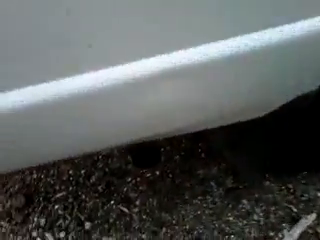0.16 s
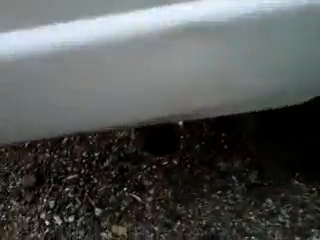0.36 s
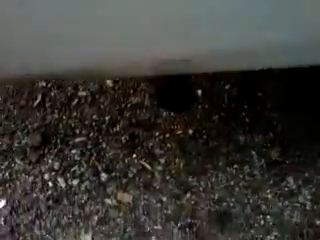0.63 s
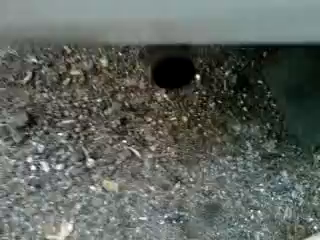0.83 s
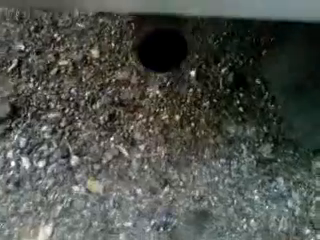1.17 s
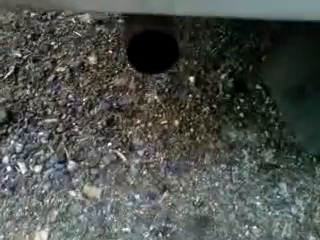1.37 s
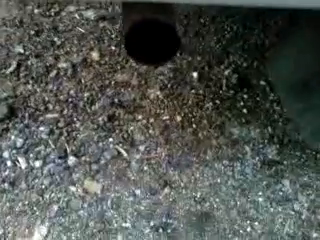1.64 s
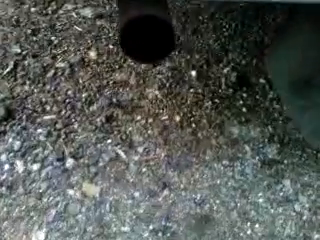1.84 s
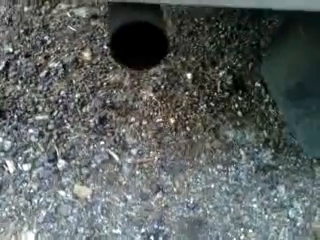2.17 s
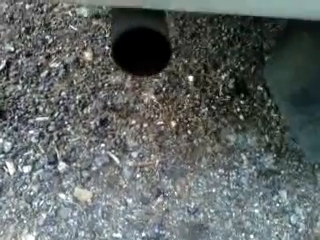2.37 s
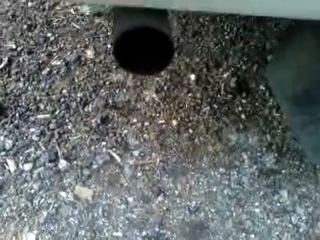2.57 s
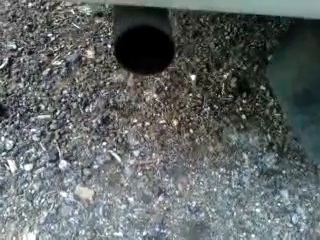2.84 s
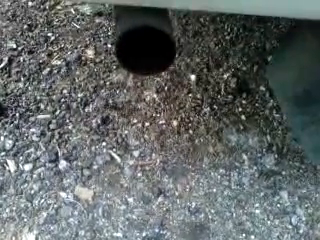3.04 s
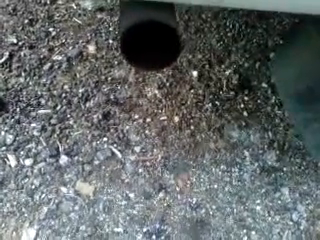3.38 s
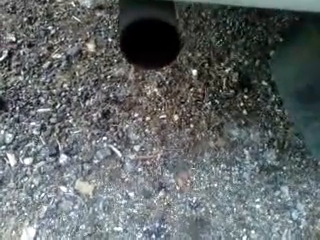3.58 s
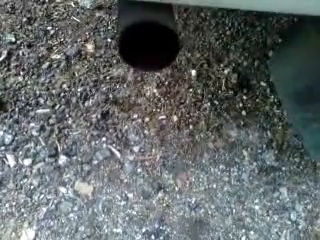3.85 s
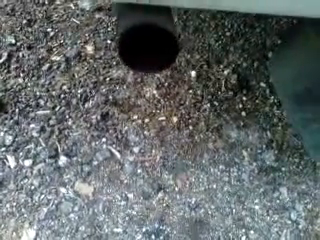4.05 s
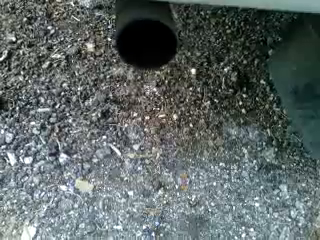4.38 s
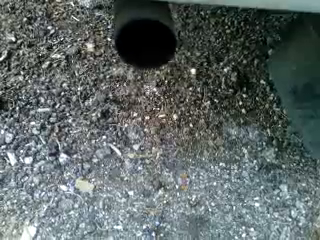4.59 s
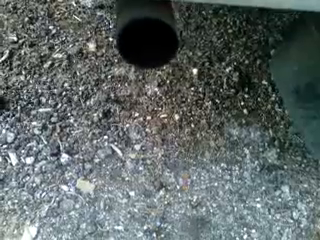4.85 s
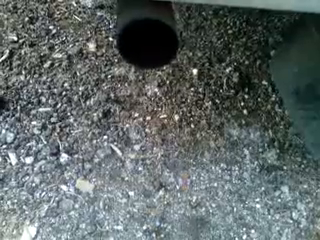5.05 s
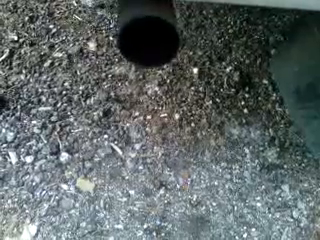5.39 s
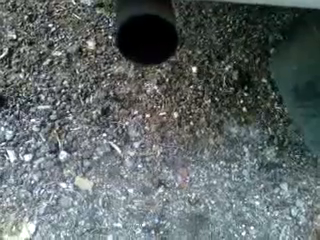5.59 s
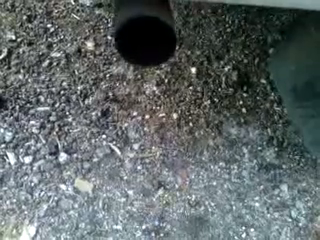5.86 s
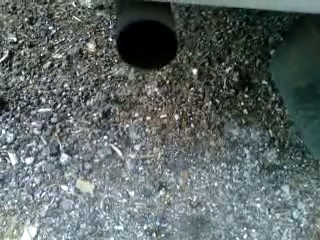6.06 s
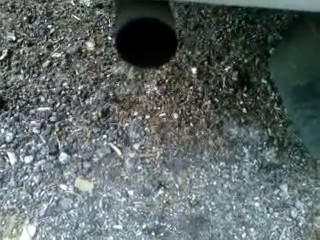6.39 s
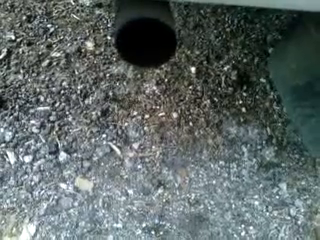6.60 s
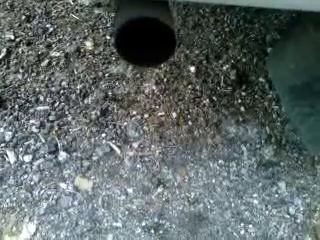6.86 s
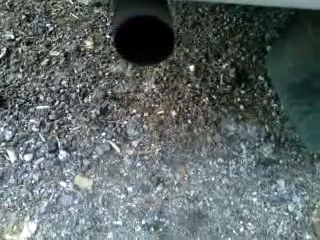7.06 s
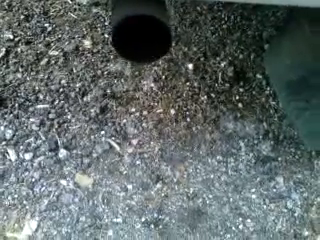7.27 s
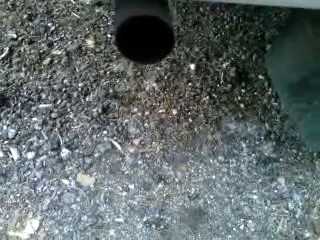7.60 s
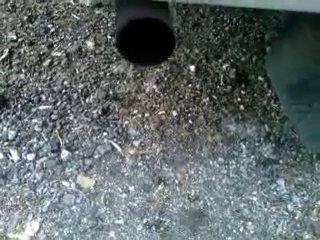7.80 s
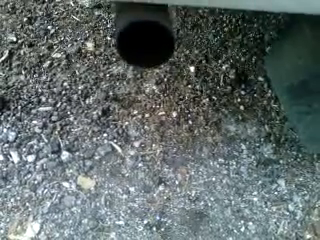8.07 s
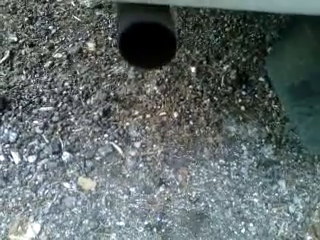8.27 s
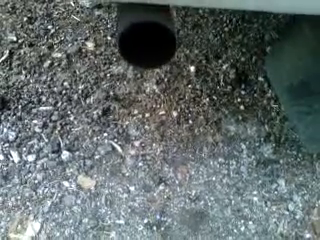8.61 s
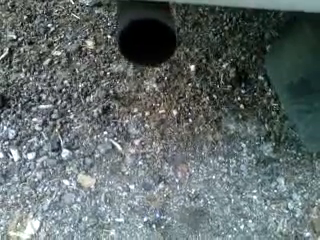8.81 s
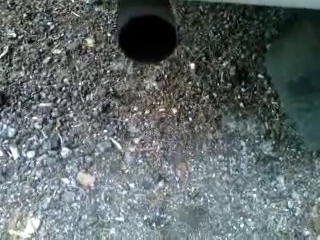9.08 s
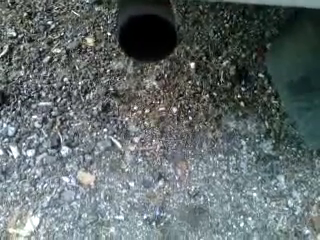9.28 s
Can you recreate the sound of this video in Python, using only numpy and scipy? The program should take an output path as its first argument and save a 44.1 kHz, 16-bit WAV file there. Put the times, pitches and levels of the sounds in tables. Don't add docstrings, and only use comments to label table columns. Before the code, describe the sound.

Rapid, low exhaust pulses, about twenty-five a second, merge into a fluttering throb, heard very close outdoors. Puffs of gas ring hollowly in the pipe and the engine bay hisses behind. Early on, wind-like gusts buffet the microphone, strongest just after one second; from the middle onwards a steady droning pipe note swells and sags in uneven surges. The sound is band-limited and slightly gritty.

```python
import sys
import numpy as np
from scipy import signal
from scipy.fft import rfft, irfft, dct
from scipy.io import wavfile
from scipy.ndimage import uniform_filter1d

SR = 44100
rng = np.random.default_rng(int(sys.argv[2]) if len(sys.argv) > 2 else 0)


def convert_level_to_amplitude(level_db):
    exponent = np.asarray(level_db, float) / 20
    return 10 ** exponent


def file_out(sig):
    cols = np.atleast_2d(sig).T
    lim = np.clip(cols, -1, 1)
    pcm = np.round(lim * 32767).astype(np.int16)
    wavfile.write(sys.argv[1], SR, pcm)


N = 415863

ORDER_ON_PIPE = 7
SEAM_HZ, CUTOFF_HZ = 4010, 7250


def rms_one(x):
    return x / np.sqrt(np.mean(x ** 2) + 1e-20)


def in_time(rows):
    s, *columns = np.transpose(rows)
    return [np.interp(np.arange(N) / SR, s, column) for column in columns]


def bumps(rows, width_s):
    t = np.arange(0, N, 100) / SR
    level_db = sum(rise_db * np.exp(-((t - s) / width_s) ** 2) for s, rise_db in rows)
    return np.interp(np.arange(N) / SR, t, level_db)


def drift(rate):
    r = np.exp(-80 * np.pi * rate / SR)
    settle = 2000
    noise = rng.standard_normal(N // 40 + settle + 2)
    slow = signal.lfilter([1], [1, -2 * r, r * r], noise)[settle:]
    return np.interp(np.arange(N) / 40, np.arange(len(slow)), rms_one(slow))


def resonate(x, modes):
    out = 0
    for k, (hz, width, level_db) in enumerate(modes):
        r = np.exp(-np.pi * width / SR)
        a = [1, -2 * r * np.cos(2 * np.pi * hz / SR), r * r]
        b = np.array([1, 0, -1]) * (1 - r * r) / 2
        out = out + (-1) ** k * convert_level_to_amplitude(level_db) * signal.lfilter(b, a, x)
    return out


def coloured(points, patchy_db, count):
    hz, level_db = np.transpose(points)
    grid = np.maximum(np.arange(N // 2 + 1) * SR / N, 1)
    gain_db = np.interp(np.log(grid), np.log(hz), level_db, left=-120, right=-120)
    shaped = rfft(rng.standard_normal(N)) * convert_level_to_amplitude(gain_db)
    place = count * np.log(grid / hz[0]) / np.log(hz[-1] / hz[0])
    total = 0
    for k in range(count + 1):
        band = irfft(shaped * np.clip(1 - abs(place - k), 0, 1), N)
        total = total + band * convert_level_to_amplitude(patchy_db * drift(9))
    return rms_one(total)


def even(x, window_s):
    return x / np.sqrt(uniform_filter1d(x ** 2, int(window_s * SR)) + 1e-9)


def hunting():
    # (speed is up [s], swell is cut [s], speed lift [Hz], sag after it [Hz], swell [dB])
    surges = [(0.2, 0.71, 2.1, 3.5, 0.5), (1.058, 1.738, 3.32, 3, 2.5), (2.068, 2.229, 3.28, 0.0, -0.3),
              (2.571, 2.83, 4.2, 1.3, 4), (3.51, 3.9, 4.7, 2.0, 5.5), (4.333, 4.673, 3.6, 0.3, 8),
              (4.888, 5.099, 2.47, 0.5, 4.5), (5.432, 5.75, 4.3, 1.7, 7.5), (6.451, 6.671, 3.7, 1.1, 7),
              (6.979, 7.139, 2.18, 1.7, 3.5), (7.541, 7.792, 2.1, 0.0, 6.3), (8.162, 8.393, 1.54, 0.0, 2.8),
              (8.83, 9.101, 2.08, 1, 4.3)]
    # (time [s], loss [dB])
    stumbles = [(.09, 14.5), (.24, -2), (.36, 3), (.6, 3), (.86, 5.5), (1.01, 4), (1.2, -1), (1.96, 4),
                (2.8, -1.5), (2.87, 2), (2.94, -3.5), (3.001, 5.5), (3.33, 3), (4.02, -1.5), (4.15, 8),
                (5.97, 5), (6.2, 0.5), (7.21, 1.5), (8.03, 1), (8.76, 0), (9.28, 5)]
    rest_hz = 178.54
    rise_s, ease_s, fall_s, recover_s = .209, .077, .079, .425
    lag_s, swell_rise_s, cut_s = .04, .11, .07
    early_share, sag_db_per_hz = .68, 1.85
    t = np.arange(N) / SR
    hz, swell_db = np.full(N, rest_hz), np.zeros(N)
    for up, cut, lift, sag, level_db in surges:
        slowest = cut + fall_s
        speed_times = [up - rise_s, up, cut - ease_s, slowest, slowest + recover_s]
        hz += np.interp(t, speed_times, [0, lift, lift, -sag, 0])
        early, low = up + lag_s, cut + cut_s
        swell_times = [early - swell_rise_s, early, cut, low, low + recover_s]
        swell_levels = [0, early_share * level_db, level_db, -sag_db_per_hz * sag, 0]
        swell_db += np.interp(t, swell_times, swell_levels)
    return uniform_filter1d(hz, size=4400), swell_db - bumps(stumbles, width_s=.058)


def throb(firings, throb_db, orders_db, uneven_db):
    # (order [firing rate], level [dB], lag [cycles])
    low_orders = [(.5, -22, 0), (1.5, -13, .3), (2, -3, .0), (3, -3, .5), (3.5, -13, .2), (4, -5, .5),
                  (4.5, -16, .7), (6, -15, .1), (8, -16, .6)]
    angle = 2 * np.pi * (firings - .5)
    out = -convert_level_to_amplitude(throb_db + .5 * drift(6.8)) * np.sqrt(2) * np.cos(angle)
    for order, level_db, lag in low_orders:
        wander = .08 * order * drift(5)
        level = convert_level_to_amplitude(orders_db + level_db + uneven_db * drift(8.0))
        out -= level * np.cos(order * angle - 2 * np.pi * lag + wander)
    return out


def pipe_tone(firings, tone_db, rough):
    kick = 1 + .16 * np.cos(2 * np.pi * (firings - .55))
    tone_db = uniform_filter1d(tone_db, size=2200)
    wobble, flutter_db = rough * drift(8), .7 * drift(25)
    tone = np.sin(2 * np.pi * ORDER_ON_PIPE * firings + wobble)
    return convert_level_to_amplitude(tone_db + flutter_db) * np.sqrt(2) * kick * tone


def puffs(firings, puff_db, sharp):
    # (frequency [Hz], width [Hz], level [dB])
    pipe_modes = [(141.4, 27, -7.5), (207.5, 24, -6), (264, 20, -0.5), (289.6, 24, -5), (325.4, 26, -8),
                  (356.2, 22, -5), (423, 40, -15), (526.6, 28, -13.5)]
    gate = 0.75 + np.exp(sharp * (np.cos(2 * np.pi * (firings - .72)) - 1))
    opening = np.diff((firings - .7 + .01 * drift(12)).astype(int), prepend=0) > 0
    strength = convert_level_to_amplitude(0.93 * rng.standard_normal(N))
    knocks = rms_one(resonate(opening * strength, pipe_modes))
    rush = rms_one(resonate(gate * rng.standard_normal(N), pipe_modes))
    steady = even(convert_level_to_amplitude(-3) * knocks + rush, .2)
    return convert_level_to_amplitude(uniform_filter1d(puff_db, size=4400) - 1.0) * steady


def hiss(firings, body_db, top_db):
    # (frequency [Hz], width [Hz], level [dB])
    bay_modes = [(1208, 90, -10), (1507, 75, -9.5), (2390, 200, -10.5)]
    # (frequency [Hz], density [dB per Hz])
    body_spectrum = [(160, -24.5), (280, -2), (309, -8.5), (354, -6), (467, -12.5), (528, -12.5),
                     (577, -11.5), (1130, -12.5), (1500, -10.5), (1700, -12.5), (2370, -13.5), (3100, -21),
                     (4000, -28), (5200, -58.5), (8800, -120)]
    # (frequency [Hz], density [dB per Hz])
    top_spectrum = [(4040, 1.5), (4260, 2.5), (5000, -0.5), (5700, -2), (6400, -6), (7000, -7), (7400, -5)]
    ringing = resonate(resonate(rng.standard_normal(N), bay_modes), bay_modes)
    panels = rms_one(ringing) * convert_level_to_amplitude(2.0 * drift(2.5))
    body = coloured(body_spectrum, patchy_db=1.5, count=9) + convert_level_to_amplitude(-10.5) * panels
    beat = 1 + 0.033 * np.cos(2 * np.pi * firings)
    treble = convert_level_to_amplitude(top_db) * coloured(top_spectrum, patchy_db=1.16, count=5)
    return convert_level_to_amplitude(body_db + 1.73) * beat * body + treble


def ticks():
    # (time [s], peak [dB], frequency [Hz], 60 dB decay [s])
    impacts = [(0.011, -33, 994, 0.03), (0.254, -42, 1280, 0.12), (.489, -36, 980, 0.13),
               (0.489, -41, 2020, 0.055), (.497, -40, 682, 0.086), (.486, -44, 5560, 0.12),
               (.49, -45.5, 6500, 0.055), (.492, -49, 4430, 0.066), (.515, -39, 1203, 0.091),
               (.528, -37, 2180, 0.15), (0.577, -47, 5550, 0.073), (0.895, -42, 5320, 0.1),
               (3.434, -44.5, 5480, 0.11), (4.165, -45, 5042, .1)]
    out, t = np.zeros(N), np.arange(6000) / SR
    for s, peak_db, hz, t60 in impacts:
        burst = rng.standard_normal(len(t)) * convert_level_to_amplitude(-60 * t / t60) * np.minimum(t / .002, 1)
        mode = [(hz, .25 * hz, 0)]
        burst = resonate(resonate(burst, mode), mode)
        start = round(s * SR)
        out[start:start + len(t)] += convert_level_to_amplitude(peak_db) * burst / abs(burst).max()
    return out


def buffeting(buffet_db):
    # (frequency [Hz], density [dB per Hz])
    jet_spectrum = [(30, -14), (45, -16.5), (75, 3), (105, -6), (135, -1.5), (165, -9), (230, -10.5)]
    # (time [s], peak [dB], frequency [Hz])
    thumps = [
        (.76, -28, 80),
        (1.267, -22, 73),
        (3, -25, 84.85),
        (4.71, -30.5, 74.33),
        (5.03, -35, 89.6),
        (6.108, -31.5, 78.9),
        (6.58, -28.5, 75.15),
        (7.85, -41, 79.94),
    ]
    out = even(coloured(jet_spectrum, patchy_db=4.0, count=4), 0.18)
    out = convert_level_to_amplitude(buffet_db - 10.5) * out
    half = 2000
    t = np.arange(-half, half) / SR
    for s, peak_db, hz in thumps:
        i = round(s * SR)
        pulse = np.exp(-(t / 0.0086) ** 2) * np.cos(2 * np.pi * hz * t)
        out[i - half:i + half] -= convert_level_to_amplitude(peak_db) * pulse
    return out


def thinning():
    # (time [s], length [s], loss [dB])
    thin_spells = [(4.703, 0.8, 4), (5.538, 0.17, 4.5), (5.803, .2, 4), (6.382, 0.035, 2.5),
                   (6.559, .5, 4.5), (7.455, .12, 5.5), (7.591, 0.17, 5.5), (8.016, 0.34, 4.5),
                   (8.41, 0.17, 4.5), (8.701, .3, 4), (9.08, .33, 4)]
    hold_share, edge_s = 0.53, 0.042
    t = np.arange(N) / SR
    level_db = 0
    for s, length, loss_db in thin_spells:
        times = [s - edge_s, s, s + hold_share * length, s + length]
        level_db = level_db + np.interp(t, times, [0, -loss_db, -loss_db, 0])
    return level_db


def scene():
    # (time [s], firing throb by nearness to the pipe mouth [dB],
    # opening towards the engine bay [dB])
    position = [(0.0, -43, -3), (.3, -45, 1), (.42, -40.5, 0.5), (.9, -38, 1), (1.22, -36.5, 3.5),
                (1.35, -37, 0), (1.65, -34.5, -0.5), (1.76, -37, 1.5), (1.9, -35, 0), (2.65, -33.5, 0.5),
                (3.0, -35, -1), (3.5, -33.5, 0), (3.97, -34.5, -0.5), (4.07, -40.5, -0.5), (5.6, -40.5, -3),
                (7.3, -41.5, -1.5), (8.1, -42, -1.5), (9.43, -43, -3.5)]
    # (time [s], rise [dB])
    gusts = [(.6, 2), (.77, 9.5), (.93, 5.5), (1.27, 10.5), (1.52, 5), (1.7, 3), (1.82, 5), (1.93, 5.5),
             (2.15, -7.5), (2.4, 4), (2.7, 3.5), (3.0, -1.5), (3.2, -0.5), (3.55, 4.5), (4.69, 6),
             (5.02, 6), (5.72, 6), (6.11, 5), (6.58, 8), (7.8, 7), (8.75, 1.5)]
    # (time [s], rise [dB])
    slugs = [(.2, -4.5), (.36, -4), (1.0, -3.5), (1.22, 5.5), (1.55, -4), (1.8, 3), (2.15, 7), (2.35, 3.5),
             (2.45, 3), (2.68, 3.5), (3.2, 3.5), (3.43, 5), (3.73, 6.5), (4.03, 4), (4.3, 2.5), (4.5, 4.5),
             (4.65, 4.5), (5.15, 9), (5.5, 5.5), (5.72, 5.5), (6.15, 2), (6.33, 4), (6.6, 5), (7.27, 5.5),
             (7.62, 5.5), (7.78, 4), (8.0, -6.5), (8.45, 4.5), (8.55, -5), (8.86, 3)]
    tone_hz, swell_db = hunting()
    throb_db, bay_db = in_time(position)
    nearer_db = throb_db + 40

    buffet_db = -42 + 0.92 * nearer_db + bumps(gusts, width_s=.07) + 0.6 * drift(2.7)
    puff_db = -51.5 + .52 * nearer_db + .25 * swell_db
    puff_db = puff_db + bumps(slugs, width_s=.06) + 0.06 * drift(2.8)
    body_db = -50 + 0.18 * nearer_db
    top_db = -60.5 + bay_db + thinning()

    firings = 0.3107 + np.cumsum(tone_hz / ORDER_ON_PIPE) / SR
    orders_db = .6 * (throb_db - 1.8) + .4 * buffet_db
    exhaust = throb(firings, throb_db, orders_db, uneven_db=2.8)
    exhaust = exhaust + pipe_tone(firings, throb_db - 1.5 + swell_db, rough=0.28)
    gas = puffs(firings, puff_db, sharp=6.6) + buffeting(buffet_db)
    rush = hiss(firings, body_db, top_db)
    return (exhaust + gas + rush + ticks())[None]


def starve(x, usual_db, coarse_db, lead):
    frame = 2822
    half, count = frame // 2, (N + lead) // frame + 2
    window = np.sin(np.pi * (np.arange(2 * frame) + .5) / (2 * frame))
    padded = np.pad(x, (lead, (count + 1) * frame - N - lead))
    frames = padded[np.arange(count)[:, None] * frame + np.arange(2 * frame)] * window
    a, b, c, d = np.split(frames, 4, axis=1)
    lines = dct(np.hstack([-c[:, ::-1] - d, a - b[:, ::-1]]), type=4, norm="ortho")
    hz = (np.arange(frame) + .5) * SR / (2 * frame)
    local = np.sqrt(uniform_filter1d(lines ** 2, size=48, axis=1) + 1e-20)
    top_lines = lines[:, (hz > SEAM_HZ) & (hz < CUTOFF_HZ)]
    top_db = 10 * np.log10(np.mean(top_lines ** 2, axis=1, keepdims=True) + 1e-20)
    finer_db = np.interp(hz, [250, 500, 2500, 3600, 7000], [-30, -10, -6, -2, 1])
    step = local * convert_level_to_amplitude(coarse_db + finer_db - .35 * (top_db - usual_db))
    lines = np.sign(lines) * np.floor(abs(lines) / step + .4) * step * (hz < CUTOFF_HZ)
    folded = dct(lines, type=4, norm="ortho")
    u, v = folded[:, :half], folded[:, half:]
    frames = np.hstack([v, -v[:, ::-1], -u[:, ::-1], -u]) * window
    joined = (frames[1:, :frame] + frames[:-1, frame:]).ravel()
    return joined[lead - frame:lead - frame + N]


def band_limit(x):
    return signal.sosfilt(signal.butter(12, 7200, fs=SR, output="sos"), x)


def record(dry):
    # (time [s], length [s])
    dropouts = [
        (3.6, .016),
        (4.7, .014),
        (8.4, .016),
    ]
    notch = signal.butter(2, [SEAM_HZ - 35, SEAM_HZ + 35], "bandstop", fs=SR, output="sos")
    seamed = signal.sosfilt(notch, dry[0])
    stepped = starve(seamed, usual_db=-53, coarse_db=6.8, lead=4410)
    high = signal.butter(6, SEAM_HZ, "high", fs=SR, output="sos")
    top = signal.sosfiltfilt(high, stepped)
    t = np.arange(N) / SR
    gaps = sum(np.clip((length / 2 - abs(t - s)) / .003, 0, .92) for s, length in dropouts)
    offset = .0009
    return band_limit((stepped - gaps * top)[None] + offset)


dry = scene()
out = record(dry)
file_out(out)
```